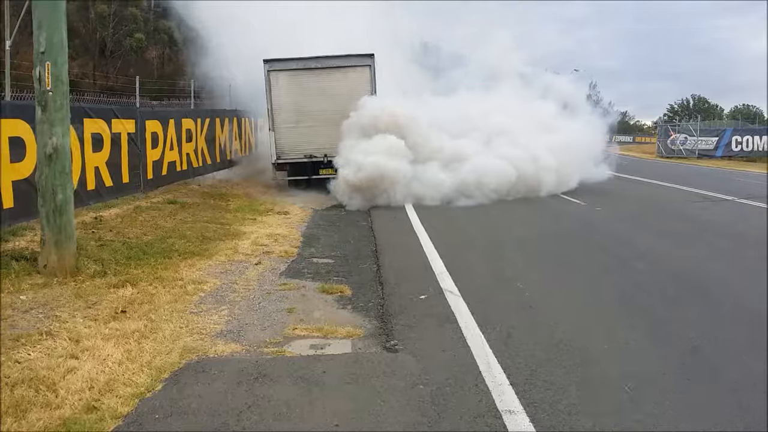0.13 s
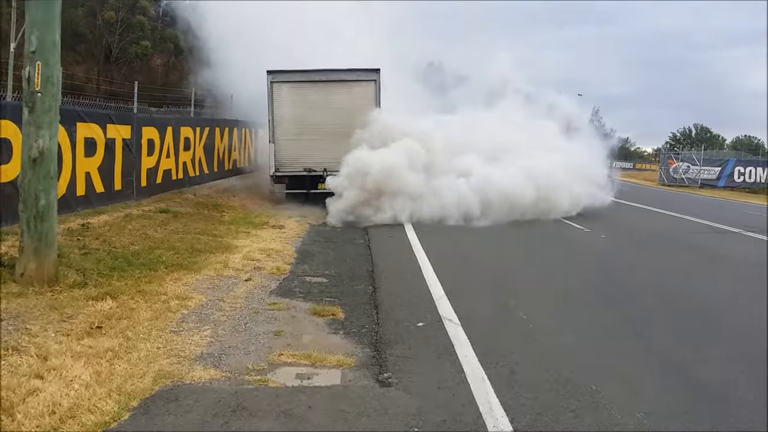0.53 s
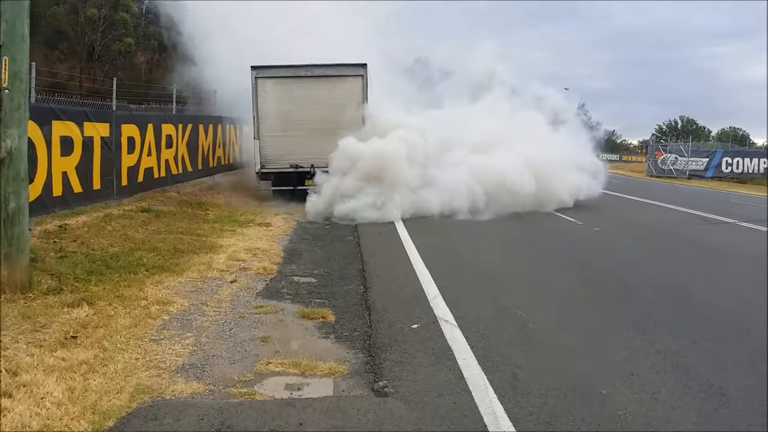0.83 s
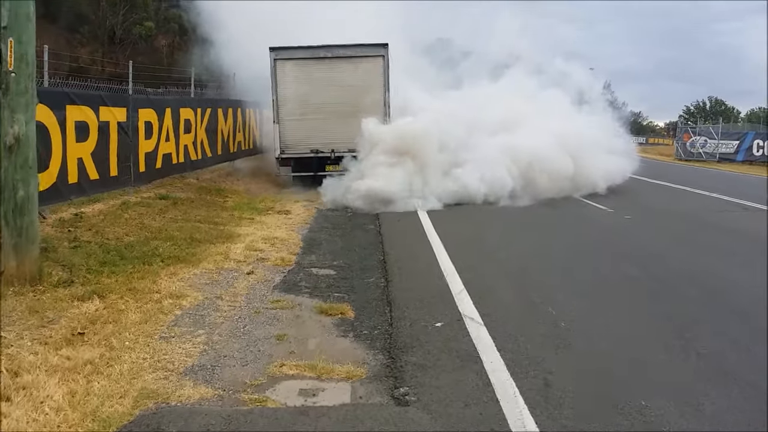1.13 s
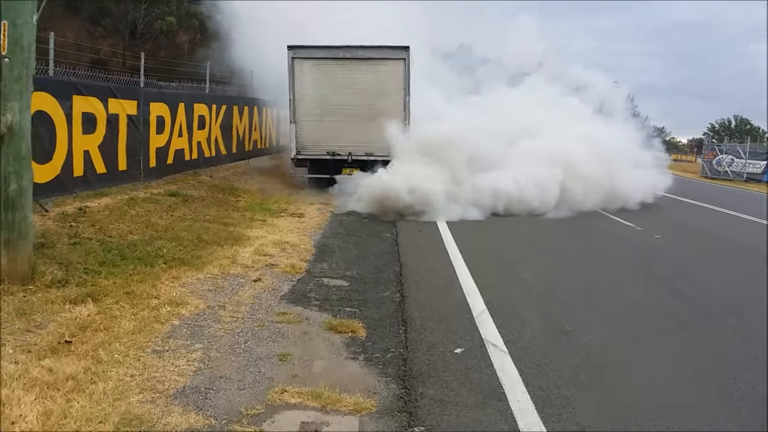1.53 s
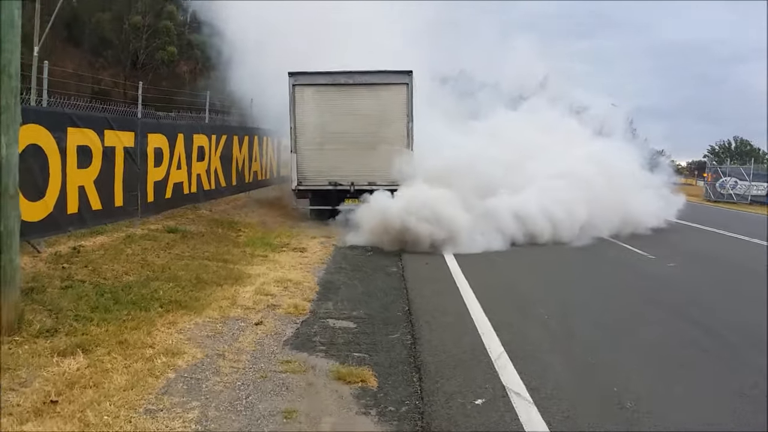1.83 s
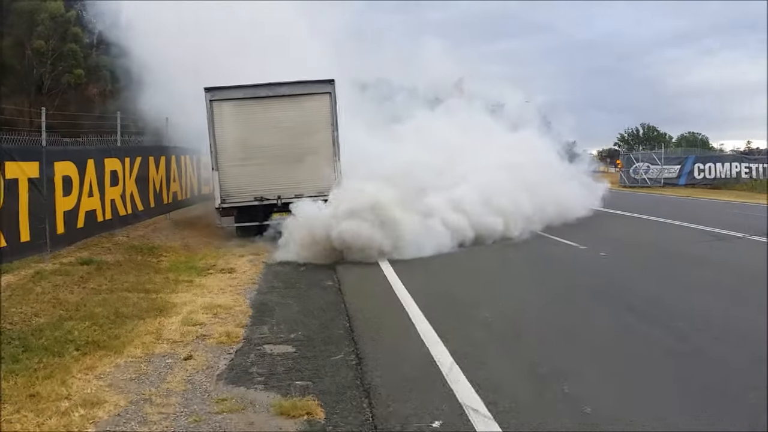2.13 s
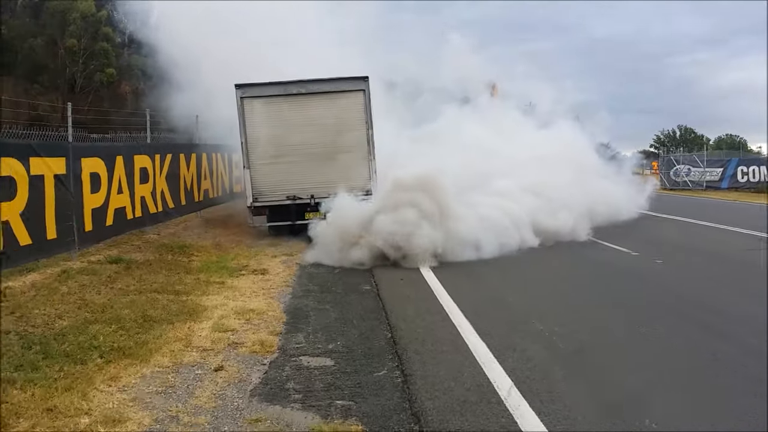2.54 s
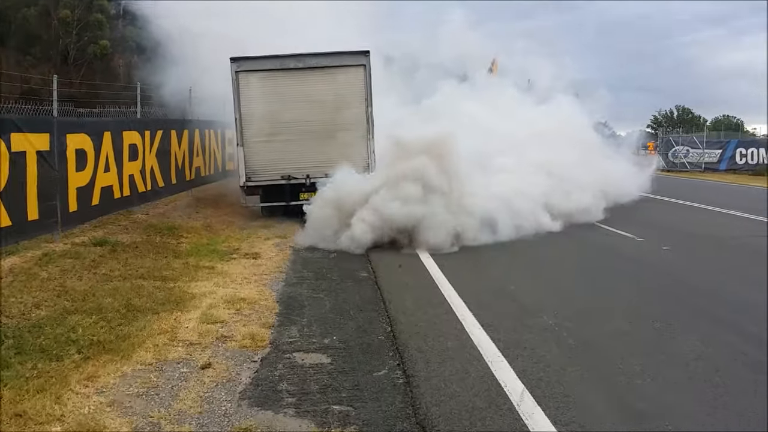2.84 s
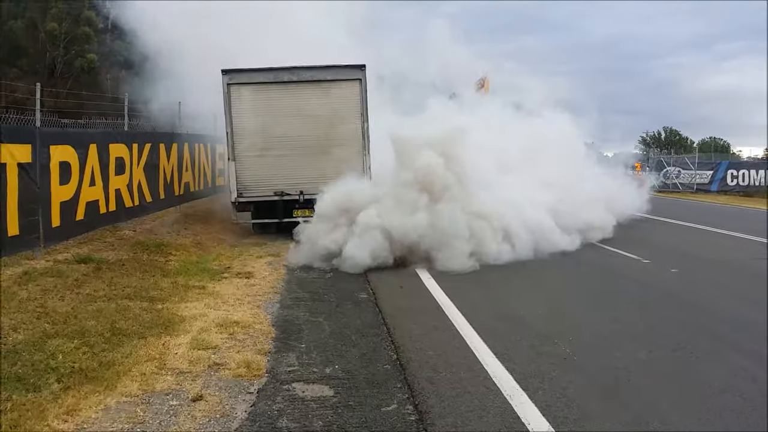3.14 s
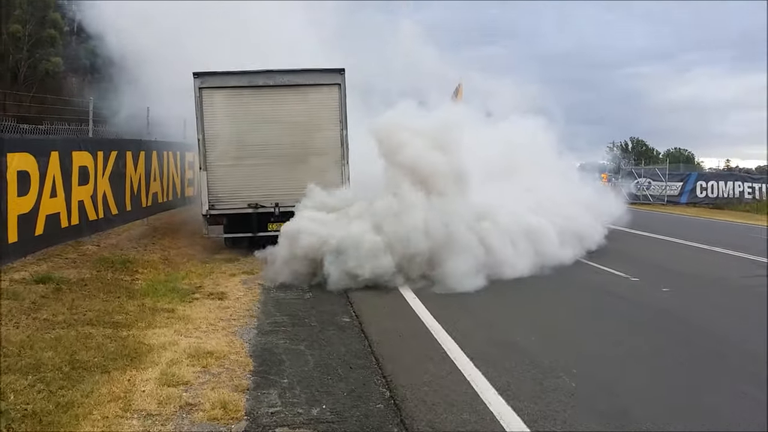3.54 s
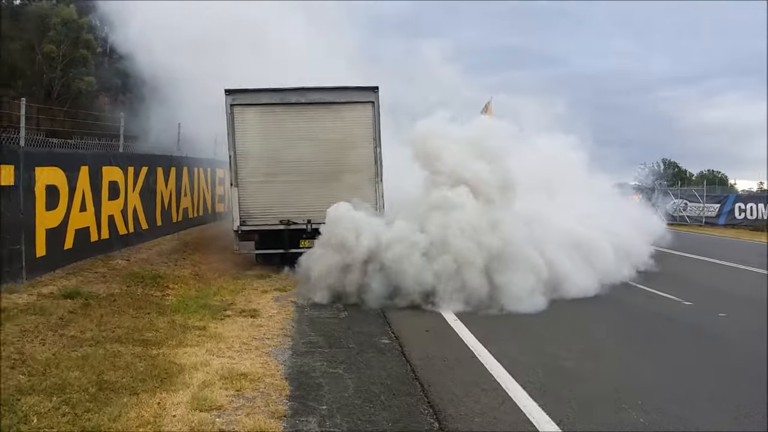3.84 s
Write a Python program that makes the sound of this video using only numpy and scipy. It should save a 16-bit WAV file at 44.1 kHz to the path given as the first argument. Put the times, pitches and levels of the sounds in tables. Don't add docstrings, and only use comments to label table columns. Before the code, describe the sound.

A diesel truck engine runs away at full speed, droning, knocking and hissing beside a road.

```python
import sys
import numpy as np
from scipy import signal
from scipy.fft import rfft, irfft, next_fast_len
from scipy.io import wavfile
from scipy.ndimage import uniform_filter1d, map_coordinates

SR = 44100
rng = np.random.default_rng(int(sys.argv[2]) if len(sys.argv) > 2 else 0)


def inscribe(sig):
    pcm = np.round(np.clip(np.atleast_2d(sig).T, -1, 1) * 32767)
    wavfile.write(sys.argv[1], SR, pcm.astype(np.int16))


def field_ratio(decibels):
    return 10 ** (np.asarray(decibels, dtype=float) / 20)


N = 176400
FADE_S, TICK_S = 0.41, 2.003


def unit(x):
    return x / np.sqrt(np.mean(x ** 2) + 1e-20)


def along(points, hz):
    f, v = np.transpose(points)
    return np.interp(np.log(hz + 1), np.log(f + 1), v)


def curves(rows, t):
    s, *cols = np.transpose(rows)
    return [np.interp(t, s, c) for c in cols]


def wobble(rate):
    at = np.arange(0, N + 64, 64)
    knots = rng.standard_normal(400)
    return np.interp(np.arange(N), at, map_coordinates(knots, [at * np.clip(rate, 0, 90) / SR]))


def filtered(x, response):
    m = next_fast_len(N + SR // 2)
    return irfft(rfft(x, m) * response(np.fft.rfftfreq(m, 1 / SR)), m)[..., :N]


# order (multiple of the four-stroke cycle), before_turn_db, after_turn_db
PIPE_TONES = [(2, -29, -36), (3, -34, -30), (4, -2, -1), (5, -22, -22), (6, -18.5, -18.5),
              (7, -24.5, -29.5), (8, -20.5, -28), (9, -28, -46), (11, -35, -42), (12, -30.5, -27),
              (13, -30, -33), (14, -24.5, -23.5)]


def pipe(cycle, turn):
    fan_order, blades = 2.555, 4.95
    tones = [(round(order), before + turn * (after - before)) for order, before, after in PIPE_TONES]
    tones += [(fan_order, -23.5), (blades * fan_order, -25.5)]
    total = 0
    for order, db in tones:
        drift_db, drift_rad = (.4, .03) if order == 4 else (3, .2)
        level = field_ratio(db + drift_db * wobble(9))
        phase = 2 * np.pi * (order * cycle + rng.random()) + drift_rad * wobble(7.26)
        total = total + level * np.sin(phase)
    return np.sqrt(2) * total


# before_turn_db, after_turn_db
KNOCK_TONES = [(-31, -29), (-31, -32), (-19, -22.5), (-24, -25), (-18, -19.5), (-22.5, -25), (-26, -33),
               (-24, -31), (-28, -31), (-34, -31), (-37, -31), (-40, -29), (-36, -31), (-32, -25),
               (-31, -26), (-23, -22), (-29, -25), (-21, -18), (-23, -27), (-25, -26), (-28, -32),
               (-20, -29), (-17.5, -29), (-27, -30), (-34, -37), (-24, -29), (-36, -29), (-38, -33),
               (-40, -35), (-37, -29), (-38, -29), (-29, -35), (-28, -34), (-22.5, -31), (-31, -38),
               (-32, -33), (-31, -37), (-42, -30)]
KNOCK_ORDERS = [*range(16, 25), *range(26, 46), 47, 50, 51, 52, 53, 56, 57, 58, 59]


def knock_tones(cycle, turn):
    place, lag_per_order, spread_rad = .12, .004, 1.3
    total = 0
    for order, (before, after) in zip(KNOCK_ORDERS, KNOCK_TONES):
        level = field_ratio(-0.5 + before + turn * (after - before) + 1.34 * wobble(6.976))
        phase = 2 * np.pi * order * (cycle - place - lag_per_order * order)
        total = total + level * np.cos(phase + spread_rad * rng.normal() + 0.16 * wobble(9))
    return np.sqrt(2) * total


# place_in_cycle (0-1), level_db
KNOCKS = [
    (.12, 6),
    (.36, -5),
    (0.599, -7),
    (.88, -20),
]


def cylinder_blows(cycle):
    place, db = np.transpose(KNOCKS)
    scatter_db, jitter_s = 2.5, .00004
    turns = np.arange(int(cycle[-1]))[:, None] + place
    draw = rng.standard_normal((200, 2, len(place)))[:len(turns)]
    at = (np.interp(turns, cycle, np.arange(N)) + jitter_s * SR * draw[:, 0]).ravel()
    taps = np.floor(at)[:, None] + np.arange(-7, 9)
    gap = taps - at[:, None]
    shape = np.sinc(gap) * np.cos(np.pi * gap / 16) ** 2
    size = field_ratio(db + scatter_db * draw[:, 1]).ravel()
    return np.bincount(np.clip(taps, 0, N - 1).astype(int).ravel(), (shape * size[:, None]).ravel(), N)


# pitch_hz, width_hz, before_turn_db, after_turn_db
PANELS = [(403.6, 78, -6, -3.5), (594, 93, 0, -1), (646, 79, 0.5, -1), (746, 125, -4, -7.5),
          (858, 110, -11.5, -5.5), (931, 115, -12, -3), (1110, 55, -5, -3), (1235, 62, -4.5, -15),
          (1333, 100, -6.5, -9), (1510, 150, -13.5, -6.5), (1701, 95, -3, -10), (1900, 184, -13, -13.5),
          (2060, 185, -14, -11), (2396, 175, -16.5, -27.5)]


def panels(x, column):
    def response(f):
        total = 0
        for k, row in enumerate(PANELS):
            damping = 1j * f * row[1]
            total = total + (-1) ** k * field_ratio(row[column]) * damping / (row[0] ** 2 - f * f + damping)
        return total / (1 + (f / 3200) ** 4) * field_ratio(19)
    return filtered(x, response)


def block(cycle, turn):
    blows = cylinder_blows(cycle)
    gate = unit(np.convolve(blows, np.exp(-np.arange(600) / SR / 0.005))[:N])
    rattle = rng.standard_normal(N) * (1 + 0.56 * gate) * field_ratio(0.87 * wobble(11))
    knock = filtered(unit(blows), lambda f: 1 / (1 + (1860 / (f + 1)) ** 8))
    drive = field_ratio(-17.5) * knock + field_ratio(-14.5) * unit(rattle)
    return (1 - turn) * panels(drive, 2) + turn * panels(drive, 3)


# pitch_hz, share (0-1)
REPEATS = [(2000, .5), (2800, .4), (3500, .24), (5000, .24), (6200, .1), (9000, .04)]


def clatter(cycle):
    renew_s = .6
    turns = signal.resample(rng.standard_normal((3, 9, 1360)), 4 * 1360, axis=2)
    age = np.arange(N) / SR / renew_s
    where = [age, cycle % 1 * (turns.shape[2] - 1)]
    noise = np.array([map_coordinates(path, where, order=1) for path in turns])
    return noise / np.hypot(age % 1, 1 - age % 1)


# pitch_hz, level_db (per Hz)
HISS_LEFT = [(2000, -4), (3000, -12), (5000, 1), (6700, -4.5), (7300, -7), (8400, -9.5), (10500, -19.5),
             (14500, -38.5)]
HISS_RIGHT = [(2000, -1), (3000, -6), (5000, -1), (6800, 1), (7300, -1), (8400, -5.5), (11000, -13),
              (14500, -24.5)]
# time_s, pitch_hz, boost_db
CAVITY_LEFT = [
    (.4, 6660, 11.5),
    (1, 6540, 10.5),
    (1.4, 5800, 3.5),
    (2, 5260, 4),
    (2.2, 5689, 6.5),
    (2.9, 5340, 9),
    (3.3, 5296, 3),
    (4, 5300, 3.5),
]
CAVITY_RIGHT = [
    (.4, 4500, 5.3),
    (1.2, 4870, 4),
    (2.02, 4620, 4.9),
    (2.08, 6447, 2),
    (3, 6071, 2.9),
    (4, 5942, 3.1),
]
# start_s, end_s, pitch_hz, width_hz, left_db, right_db
BANDS = [(0, 1.42, 2275, 110, 10, 7.5), (1.4, 2.3, 2000, 110, 6, 5.5), (2, 3, 2080, 110, 7, 6),
         (0, 2.05, 12200, 1000, 0, 3.5), (2.05, 4.3, 9500, 750, -5.5, 1), (2.05, 4.3, 11800, 1200, 4, 5.5),
         (4, 4.3, 1600, 130, 20.5, 16), (0, 1.15, 3200, 380, 8, 0), (0, 1.15, 8200, 900, -2.5, 1.5),
         (0.5, 2.05, 5400, 260, 0.5, -3.5), (0, 2.05, 4680, 130, -0.5, 3.5), (0, 2.05, 7500, 300, -3, -2),
         (0, 1.1, 5220, 120, 4, 2), (2.5, 4.3, 5880, 120, 2, 5.5), (2.5, 2.7, 5800, 180, 4, 0),
         (1.5, 2.05, 5000, 110, 0, 4), (0, 2.05, 4200, 120, 0, 3), (3, 4.3, 5200, 130, 1.5, 2),
         (0.5, 2.05, 13500, 600, 0, 2.5), (2, 4.3, 14000, 570, 0, 5.5), (2.05, 4.3, 3400, 1000, -1, 1.5),
         (2.05, 4.3, 7200, 300, -11, -1.5), (2.05, 3, 8400, 600, 1.5, -2), (4, 4.3, 5800, 370, 3, -0.5),
         (1.15, 2.05, 3000, 300, 1.5, -0.5), (1.15, 2.05, 9100, 500, 2, 1), (2.1, 4.3, 6740, 130, 9, 2.5)]
# pitch_hz, left_lead_rad
LEAD = [(60, 0), (130, -0.19), (1210, 0.4), (2070, 1.1), (4480, -1.25), (5860, -1.5), (9560, -4),
        (14900, -11.5)]


def port_colour(hz, t):
    hz = hz[:, None]
    colour = []
    for port, cavity in [(HISS_LEFT, CAVITY_LEFT), (HISS_RIGHT, CAVITY_RIGHT)]:
        peak, boost = curves(cavity, t)
        colour.append(along(port, hz) + boost * np.exp(-((hz - peak) / 740) ** 2))
    colour = np.array(colour)
    for start, end, centre, width_hz, *db in BANDS:
        present = np.clip(np.minimum(t - start, end - t) / 0.066, 0, 1)
        colour = colour + np.reshape(db, (2, 1, 1)) * np.exp(-((hz - centre) / width_hz) ** 2) * present
    return colour


def hiss(cycle):
    surge = np.cos(2 * np.pi * (cycle - .55)) + 0.36 * np.cos(4 * np.pi * (cycle - .1))
    pulse = field_ratio(surge + 0.53 * wobble(30.11))
    fresh = filtered(rng.standard_normal((3, N)), lambda hz: np.sqrt(1 - along(REPEATS, hz)))
    shared, *own = fresh + filtered(clatter(cycle), lambda hz: np.sqrt(along(REPEATS, hz)))

    def share(hz):
        return 0.58 / (1 + (hz / 7500) ** 4)

    def lead(hz):
        return np.exp(.5j * along(LEAD, hz) * [[1], [-1]])

    pair = filtered(shared, lambda hz: lead(hz) * np.sqrt(share(hz)))
    pair = pair + filtered(np.array(own), lambda hz: np.sqrt(1 - share(hz)))
    hz, t, z = signal.stft(pair * pulse, SR, nperseg=512)
    patches = uniform_filter1d(uniform_filter1d(rng.standard_normal(z.shape), 7, 1), 16, 2)
    streaks = uniform_filter1d(uniform_filter1d(rng.standard_normal(z.shape), 2, 1), 90, 2)
    colour = port_colour(hz, t) + 1.32 * unit(streaks) + 0.53 * unit(patches)
    z = z / (1 + (1600 / (hz[:, None] + 1)) ** 6)
    return field_ratio(-10.5) * unit(signal.istft(z * field_ratio(colour), SR, nperseg=512)[1][:, :N])


# pitch_hz, level_db
RUMBLE = [(20, -15), (50, -15), (75, -10), (130, 0.5), (220, 0), (330, -10.5), (850, -23), (2200, -28.5)]


def rumble():
    air = filtered(rng.standard_normal(N), lambda hz: field_ratio(along(RUMBLE, hz)) / (1 + (hz / 2600) ** 6))
    return field_ratio(-20.5 + 0.74 * wobble(5.3)) * unit(air)


# pitch_hz, left_over_right_db
SIDEWAYS = [(60, -1), (160, -3), (440, -3), (730, -1), (1210, -0.5), (1990, 5), (3280, 13)]
# pitch_hz, level_db
DIFFUSE = [(30, -8), (70, -20), (130, -39), (400, -17), (1000, -16.5), (2000, 2)]


def ports(x):
    def offset(hz):
        half_level = along(SIDEWAYS, hz) * np.log(10) / 40
        return np.exp((half_level + .5j * along(LEAD, hz)) * [[1], [-1]])

    decay = field_ratio(-60 * np.arange(SR // 4) / SR / 0.13)
    tail = rng.standard_normal((2, SR // 4)) * decay
    scatter = signal.fftconvolve(x[None], tail / np.linalg.norm(tail[0]), axes=1)[:, :N]
    return filtered(x, offset) + filtered(scatter, lambda hz: field_ratio(along(DIFFUSE, hz)))


def body_tick(t):
    return field_ratio(-38 - 60 * np.abs(t - TICK_S) / 0.0049) * rng.standard_normal((2, N))


# time_s, firing_hz, level_db, turn (0-1)
ENGINE = [(.4, 129, -15.5, 0.04), (.75, 128.3, -14.5, 0.24), (1.02, 129.7, -15, 0.15),
          (1.22, 128.6, -15, 0.32), (1.4, 129.7, -14.5, 0.12), (2.1, 130.4, -15, 0.28),
          (2.25, 129.8, -15, 0.23), (2.42, 130.8, -15, 0.8), (2.6, 129.8, -15, 0.96),
          (2.8, 130.8, -15, 0.79), (3.25, 130.1, -15, 1), (3.6, 130.2, -15, 1), (3.8, 131.5, -15, 1),
          (4, 132.2, -15, 1)]


def scene():
    t = np.arange(N) / SR
    firing_hz, level_db, turn = curves(ENGINE, t)
    cycle = np.cumsum(firing_hz) / SR / 4
    turn = np.clip(turn, 0, 1)
    engine = pipe(cycle, turn) + knock_tones(cycle, turn) + block(cycle, turn) + rumble()
    return field_ratio(level_db) * (ports(engine) + hiss(cycle)) + body_tick(t)


SPARSE_HZ = [8300, 9400]
SPARSE_DB = [-69, -62]


def sparse(x):
    hz, t, z = signal.stft(x, SR, window="cosine", boundary="even", nperseg=2048, noverlap=1024)
    swing = unit(uniform_filter1d(rng.standard_normal((2, 65, len(t))), 3, 2))
    swing = np.repeat(swing, 16, 1)[:, :len(hz)]
    level = np.sqrt(uniform_filter1d(np.abs(z) ** 2, 3, 1).clip(0))
    hz = hz[:, None]
    strong = level > field_ratio(np.reshape(SPARSE_DB, (2, 1, 1)) + 3.6 * swing)
    below = hz < np.reshape(SPARSE_HZ, (2, 1, 1))
    spared = (np.abs(t - [[TICK_S], [FADE_S + .005]]).min(0) < .012) & (hz < 14600)
    keep = strong | below | spared
    return signal.istft(z * keep, SR, window="cosine", nperseg=2048, noverlap=1024)[1][:, :N]


def low_pass(x):
    return signal.sosfilt(signal.butter(12, 15320, fs=SR, output="sos"), x)


def record(dry):
    ceiling, fade_length_s = .62, 0.29
    held = dry / (1 + np.abs(dry / ceiling) ** 5) ** (1 / 5)
    fade = np.clip((np.arange(N) / SR - FADE_S) / fade_length_s, 0, 1)
    return low_pass(sparse(held) * fade)


dry = scene()
out = record(dry)
inscribe(out)
```